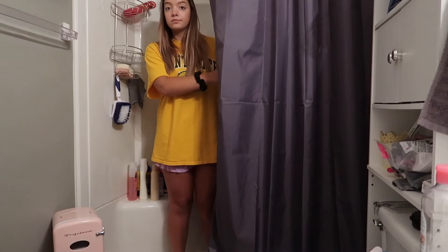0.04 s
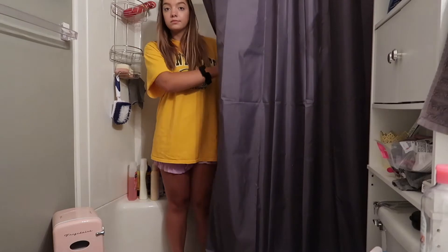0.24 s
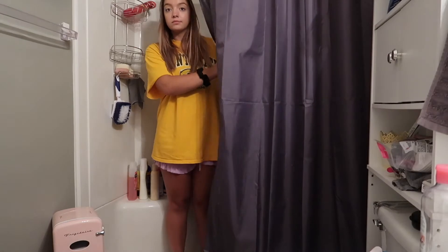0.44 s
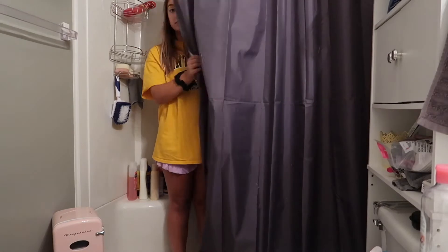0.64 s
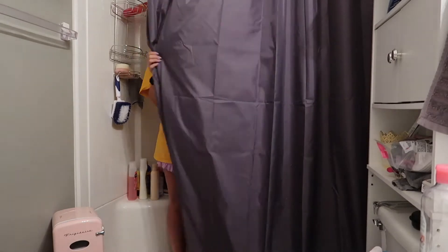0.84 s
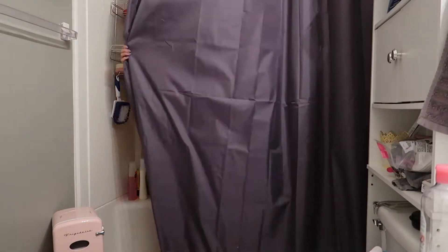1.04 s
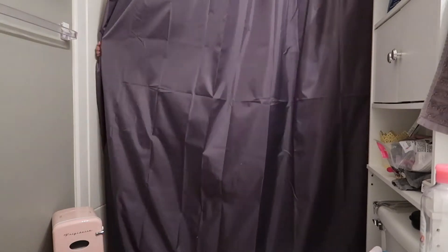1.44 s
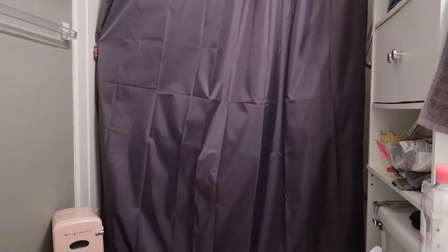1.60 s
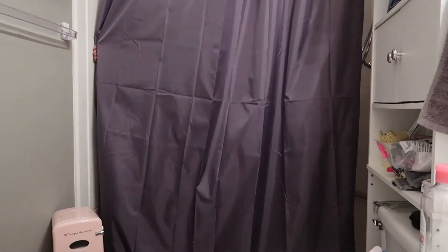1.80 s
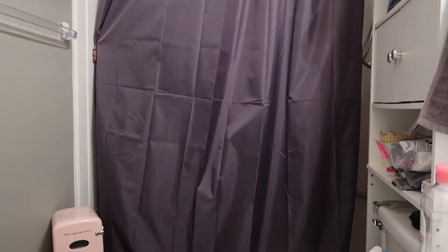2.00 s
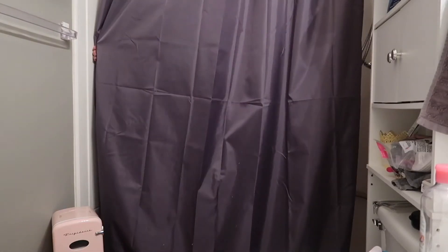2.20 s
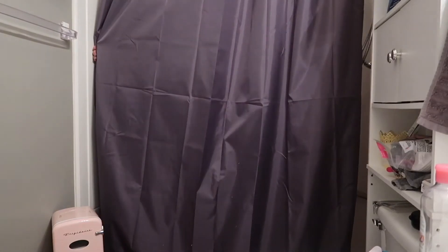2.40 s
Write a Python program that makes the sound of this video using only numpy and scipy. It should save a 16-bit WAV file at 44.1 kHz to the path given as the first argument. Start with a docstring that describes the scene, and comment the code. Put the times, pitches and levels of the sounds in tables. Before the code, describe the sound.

A plastic shower curtain starts rustling at about 0.2 seconds, its rings scraping along a metal rod. From 0.8 to 1.7 seconds the crinkling grows fuller, with short ring clatters, soft low flaps and a sharp snap near 1 second. The curtain then settles with a faint ring jingle, and one small tap comes at 2.3 seconds. A low ventilation hum runs underneath in the small bathroom.

```python
"""A faint plastic rustle rises over a low hum: a shower curtain is drawn shut in a small, hard bathroom.
Its rings scrape, chafe and clatter along the rod in short pushes, exciting the modes of the metal.
The sheet crinkles as its creases buckle, shoves the air in low puffs and snaps taut.
Close walls return a short reverberation; a few rings chime, and one last small tap ends the motion."""
import sys
import numpy as np
from scipy import signal
from scipy.fft import rfft, irfft, next_fast_len
from scipy.io import wavfile

SR = 44100
rng = np.random.default_rng(int(sys.argv[2]) if len(sys.argv) > 2 else 0)


def dump(signal):
    """Clip the signal to [-1, 1] and save it as 16-bit WAV at the path in sys.argv[1]."""
    limited = np.clip(np.atleast_2d(signal).T, -1, 1)
    pcm = np.round(limited * 32767).astype(np.int16)
    wavfile.write(sys.argv[1], SR, pcm)


N = 112454
TIME = np.arange(N) / SR

# Motion of the sheet. Each row: time in seconds, crinkling level in dB, rubbing level in dB.
SHEET_MOTION = [(0, -54, -51.5), (.08, -55, -57), (.16, -44, -44.5), (.26, -38.5, -42), (.36, -35, -40.5),
                (.45, -40, -41.5), (.6, -39.5, -42), (.73, -40, -42), (.77, -34.5, -36.5), (.84, -36, -38),
                (.96, -33.5, -34.5), (1.11, -33.5, -36), (1.24, -34, -35.5), (1.35, -33.5, -36),
                (1.47, -35.5, -38), (1.53, -32, -35.5), (1.66, -32.5, -31.5), (1.73, -42.5, -42.5),
                (1.88, -45.5, -46), (2.0, -51.5, -53.5), (2.24, -53, -52), (2.34, -59, -60),
                (2.55, -70, -74)]
# Spectra of the sheet's noises. Each row: frequency in Hz, gain in dB.
CRINKLE_SPECTRUM = [(500, -24), (1000, -4.5), (1500, 0), (2100, 1), (2900, -2), (4000, -7), (6000, -15),
                    (9000, -24), (11000, -32), (14000, -52.5)]
RUB_SPECTRUM = [(70, -31), (150, -10), (350, 1.5), (550, -1), (900, -7), (1500, -16), (4000, -33),
                (12000, -84)]
AIR_SPECTRUM = [(15, -11.5), (35, -11), (55, -9), (78, -5.5), (105, -6), (135, -8.5), (190, -7.5),
                (400, -16), (2000, -69)]
CRUMPLE_SPECTRUM = [(600, -11), (1300, -7), (2000, 0), (2700, -4.5), (3400, -9), (4500, -12), (9000, -44),
                    (15000, -70)]
# Modes of the rod and tub alcove. Each row: frequency in Hz, bandwidth in Hz, level in dB.
ALCOVE_MODES = [(128.4, 14, -12.5), (275.6, 4.7, -17), (355, 8.6, -18), (552.6, 65, -14.5)]
# Air pushed by the sheet. Each row: time in seconds, level in dB.
AIR_LEVELS = [(0, -52.5), (.7, -51), (.8, -44.5), (1.08, -38.5), (1.34, -42), (1.44, -42.5), (1.55, -34),
              (1.7, -43.5), (1.85, -54), (2.15, -56), (2.29, -49.5), (2.55, -75)]
# Ventilation noise and its hum lines. Each row: frequency in Hz, relative level in dB.
VENT_SPECTRUM = [(20, -28), (45, 1.5), (70, 2.5), (140, 2.5), (260, -5), (450, -7.5), (800, -16),
                 (2000, -23), (4000, -28), (8000, -38), (14000, -49), (16000, -57)]
HUM_LINES = [(134.6, -57.5), (255, -52.5)]
# Strokes of rings, rod and folds. Each row: start in seconds, length in seconds, relative level in dB.
RING_PUSHES = [(0.116, 0.13, -48), (0.198, 0.14, -41), (0.476, 0.0076, -39.5), (0.569, 0.024, -31),
               (0.632, 0.018, -56), (0.978, 0.077, -34), (1.134, 0.033, -34.5), (1.165, 0.025, -30),
               (1.22, 0.057, -37.5), (1.298, 0.023, -30), (1.485, 0.065, -43), (1.618, 0.028, -36),
               (1.844, 0.066, -56), (2.04, .04, -61)]
ROD_STROKES = [(.15, .29, -41.5)]
RING_CLATTERS = [(.133, .02, -60), (.25, 0.072, -65), (.405, .012, -62), (.586, .016, -47),
                 (.64, 0.013, -45.5), (.82, .01, -53), (.994, 0.017, -42), (1.135, 0.0078, -45),
                 (1.176, 0.011, -42), (1.302, 0.012, -34.5), (1.333, 0.012, -45), (1.51, 0.024, -45.5),
                 (1.56, .03, -50), (1.617, 0.0067, -46)]
FOLD_CRUMPLES = [(.479, 0.0035, -35), (.755, 0.026, -38.5), (.94, 0.016, -36.5), (.984, .008, -34),
                 (1.043, 0.019, -25.5), (1.5, 0.048, -44), (1.634, 0.012, -34)]
RING_CHIMES = [(1.845, 0.042, -49)]
# Spectra and modes of the rings. Each row: frequency in Hz, gain in dB.
SCRAPE_SPECTRUM = [(400, -5), (1500, 5), (3500, 9), (5000, 2.5), (7000, -6), (9500, -11), (11500, -51),
                   (15000, -45)]
CLATTER_SPECTRUM = [(3000, -7), (5500, 0), (8000, -5), (10500, -3.5), (12500, -5.5), (14500, -38)]
METAL_MODES = [(3890, 1), (4380, 1), (5390, -3), (6260, -1), (7540, 4.5), (8030, -1), (8770, -3),
               (10000, 1)]
SETTLING_MODES = [(2410, -9), (2730, 3), (4430, -16)]
# Rings and plastic chafing. Each row: start in seconds, length in seconds, level in dB, pitch in Hz,
# glide in octaves per second, bandwidth in Hz.
CHAFE_STROKES = [(0.346, 0.0068, -32, 1615, -25, 170), (0.354, 0.007, -35.5, 1154, -15, 170),
                 (0.372, 0.013, -35, 2340, -10, 400), (0.396, 0.0043, -35, 1880, 0, 350),
                 (0.398, .006, -31.5, 515.4, -15.5, 150), (0.78, 0.024, -41.5, 593, -0.5, 120),
                 (0.89, 0.019, -36, 2520, -3, 500), (1.022, 0.012, -27, 511.5, -1.5, 90),
                 (1.137, 0.0073, -25.5, 2110, -12, 260), (1.227, 0.018, -34, 2310, 1.5, 600),
                 (1.367, 0.01204, -34, 1860, -3, 450), (1.506, 0.032, -31, 2038, 1.5, 550),
                 (1.546, 0.0087, -23, 2033, 0, 500)]
# Blows on rod and rings. Each row: start in seconds, level in dB, pitch in Hz, 60 dB decay in seconds.
ROD_KNOCKS = [(.4035, -24.5, 432, 0.09), (1.025, -23, 502, 0.095), (1.179, -25, 3930, .05),
              (1.306, -24.5, 3880, 0.043), (2.2735, -34, 1860, .03)]
# Folds snapping and rings tapping; the sheet flapping as it fills with air.
# Each row: centre in seconds, peak in dB, frequency in Hz, half-width in milliseconds.
FOLD_SNAPS = [(.4795, -16, 2650, 0.23), (1.0445, -16, 2330, 0.56), (1.0479, -2, 2730, 0.42),
              (1.0535, -13, 2330, 0.52), (1.1668, -20, 2760, 1.1), (1.2332, -12.5, 1780, 0.27),
              (1.2442, -21.5, 2300, 1.3), (1.4099, -12, 2300, 0.25), (2.2733, -16.5, 2180, 0.56),
              (2.2731, -32, 4050, 0.39)]
SHEET_FLAPS = [(.77, -34.5, 75.5, 11), (.93, -46, 42, 25), (1.06, -33, 79, 21), (1.08, -32, 144, 26),
               (1.125, -36, 130, 21), (1.2, -40, 48, 17), (1.27, -31.5, 149.4, 32),
               (1.325, -35.5, 80.4, 25), (1.523, -33, 150, 9.4), (1.529, -29, 334, 6.7),
               (1.557, -29, 104, 7), (1.559, -23.5, 330, 4.9), (1.594, -28, 406, 6), (1.605, -34, 71.6, 25),
               (1.639, -29.5, 355, 9.3)]
# Stereo spread of curtain and room tone. Each row: frequency in Hz, gain of the side signal in dB.
CURTAIN_SPREAD = [(30, -40), (70, -40), (180, -25), (350, -21), (700, -21), (1400, -28), (2000, -26),
                  (2800, -16), (4000, -7), (6000, 0), (9000, 6), (11000, 9), (13000, 14)]
VENT_SPREAD = [(60, -63), (180, -19.5), (700, -4), (1400, -9.5), (2600, -4.5), (5000, 3), (9000, -4),
               (14000, 9)]

CREASES_PER_S, CREASE_SPREAD_DB = 1800, 2.5
SHARP_ATTACK_S = 0.00073
ROOM_T60_S, ROOM_DB, FIRST_ECHO_S = 0.18, -9, 0.00171


def from_db(db):
    """Amplitude grows tenfold for every 20 dB."""
    return 10 ** (np.asarray(db) / 20)


def unit_rms(x):
    """Dividing by the rms gives unit power."""
    return x / np.sqrt(np.mean(x ** 2) + 1e-20)


def in_time(rows):
    """Linear interpolation gives each level at every sample."""
    times, *columns = np.transpose(rows)
    return [np.interp(TIME, times, column) for column in columns]


def colour(x, spectrum):
    """Filtering multiplies the spectrum by a gain curve."""
    hz, db = np.transpose(spectrum)
    size = next_fast_len(2 * N)
    bins = np.maximum(np.arange(size // 2 + 1) * SR / size, 1)
    return irfft(rfft(x, size) * from_db(np.interp(np.log(bins), np.log(hz), db)), size)[:N]


def drift(hz):
    """Low-passed noise wanders slowly, at unit rms."""
    r = np.exp(-2 * np.pi * hz / SR)
    return unit_rms(signal.lfilter([1], [1, -2 * r, r * r], rng.standard_normal(2 * N))[N:])


def resonance(x, hz, width_hz):
    """A damped resonator selects one band, scaled to unit rms."""
    r = np.exp(-np.pi * width_hz / SR)
    return unit_rms(signal.lfilter([1, 0, -1], [1, -2 * r * np.cos(2 * np.pi * hz / SR), r * r], x))


def grains(per_s, spread_db):
    """Independent clicks of uneven size form shot noise, at unit rms."""
    sizes = from_db(spread_db * np.minimum(rng.exponential(1, N), 4))
    return unit_rms(sizes * rng.choice([-1, 1], N) * (rng.random(N) < per_s / SR))


def strokes(rows, attack_s=0.013, release_s=0.028):
    """A driven vibration builds up, then decays exponentially once the drive stops."""
    out = np.zeros(N)
    for start, length, db in rows:
        rise = 1 - np.exp(-np.maximum(TIME - start, 0) / attack_s)
        out += from_db(db) * rise * np.exp(-np.maximum(TIME - start - length, 0) / release_s)
    return out


def sheet(smooth_share=0.58):
    """Creases buckle over the friction of plastic on plastic; rod and alcove resonate with the rubbing."""
    crinkle_db, rub_db = in_time(SHEET_MOTION)
    flutter_db = 1.26 * drift(hz=21)
    pops = np.sqrt(1 - smooth_share) * grains(CREASES_PER_S, CREASE_SPREAD_DB)
    hiss = np.sqrt(smooth_share) * rng.standard_normal(N)
    crinkle = from_db(crinkle_db + flutter_db) * unit_rms(colour(pops + hiss, CRINKLE_SPECTRUM))
    friction = unit_rms(colour(grains(CREASES_PER_S, CREASE_SPREAD_DB), RUB_SPECTRUM))
    rub = from_db(rub_db + flutter_db) * friction
    body = sum(from_db(db) * resonance(rng.standard_normal(N), hz, width)
               for hz, width, db in ALCOVE_MODES)
    return crinkle + rub + from_db(rub_db) * body


def billow():
    """A moving surface displaces air, radiating low puffs."""
    air_db, = in_time(AIR_LEVELS)
    return from_db(air_db) * unit_rms(colour(rng.standard_normal(N), AIR_SPECTRUM))


def room_tone():
    """Ventilation gives dull broadband noise; two narrow bands are heard as a wavering hum."""
    hum = sum(from_db(db) * resonance(rng.standard_normal(N), hz, width_hz=1.9) for hz, db in HUM_LINES)
    vent = from_db(-48) * unit_rms(colour(rng.standard_normal(N), VENT_SPECTRUM))
    return vent + colour(hum, [(300, -1.0), (1200, -40)])


def ring_slides():
    """Sliding friction breaks each push into tiny slips; early on, one mode of the rod sings."""
    slips = unit_rms(colour(grains(per_s=2500, spread_db=1), SCRAPE_SPECTRUM))
    scrape = strokes(RING_PUSHES) * from_db(3 * drift(hz=24)) * slips
    rod_hz = 355.3 + 7.3 * drift(hz=13.4)
    rod_level = strokes(ROD_STROKES) * from_db(-3 * drift(hz=12))
    return scrape + rod_level * np.sin(2 * np.pi * np.cumsum(rod_hz) / SR)


def clatters():
    """Bunched rings collide and excite metal modes, each coming and going as the contacts move."""
    bursts = strokes(RING_CLATTERS, attack_s=0.0088, release_s=0.019)
    contacts = bursts * grains(per_s=1700, spread_db=0.5)
    crackle = unit_rms(colour(contacts, CLATTER_SPECTRUM))
    metal = sum(from_db(db + 9 * drift(hz=16)) * resonance(contacts, hz, width_hz=110)
                for hz, db in METAL_MODES)
    return np.std(contacts) * (crackle + from_db(-4) * unit_rms(metal))


def chafes():
    """Stick-slip friction gives a brief tone whose rough pitch may sink as the ring slows."""
    out = np.zeros(N)
    for start, length, db, hz, glide, width in CHAFE_STROKES:
        band = resonance(resonance(rng.standard_normal(N), hz, width), hz, width)
        analytic = signal.hilbert(band, next_fast_len(N))[:N]
        octaves = glide * np.clip(TIME - start - length / 2, -length, length)
        shift_hz = hz * (2 ** octaves - 1)
        gliding = analytic * np.exp(2j * np.pi * np.cumsum(shift_hz) / SR)
        tone = unit_rms(gliding.real / (np.abs(gliding) + 1))  # evens out the amplitude
        out += strokes([(start, length, db)], SHARP_ATTACK_S, release_s=0.0037) * tone
    return out


def knocks():
    """An impulse leaves one mode in free, damped vibration."""
    out = np.zeros(N)
    for start, db, hz, t60 in ROD_KNOCKS:
        age = np.maximum(TIME - start, 0)
        out += from_db(db - 60 * age / t60) * np.sin(2 * np.pi * hz * age)
    return out


def crumples():
    """Folds buckle in bursts of clicks as tension pulls the sheet taut."""
    creases = unit_rms(colour(grains(CREASES_PER_S, CREASE_SPREAD_DB), CRUMPLE_SPECTRUM))
    return strokes(FOLD_CRUMPLES, SHARP_ATTACK_S) * creases


def pulses(rows):
    """A snap or flap radiates a Gaussian wave packet: the shorter it is, the wider its band."""
    out = np.zeros(N)
    for centre, db, hz, half_ms in rows:
        offset = TIME - centre
        envelope = np.exp(-np.minimum((offset * 1000 / half_ms) ** 2, 50))
        out += from_db(db) * envelope * np.cos(2 * np.pi * hz * offset)
    return out


def chimes():
    """Lightly damped modes of the rings sound as the curtain settles."""
    modes = sum(from_db(db) * resonance(rng.standard_normal(N), hz, width_hz=19)
                for hz, db in SETTLING_MODES)
    return strokes(RING_CHIMES) * modes


def reflections(x):
    """Dense echoes from close, hard walls merge into an exponential tail of unit energy."""
    age = TIME[:SR // 2]
    tail = rng.standard_normal(len(age)) * from_db(-60 * age / ROOM_T60_S) * (age >= FIRST_ECHO_S)
    return signal.fftconvolve(x, tail / np.sqrt(np.sum(tail ** 2)))[:N]


def along_rod():
    """Creases and rings all along the rod add as incoherent sources."""
    return sheet() + ring_slides() + clatters() + crumples()


def scene(wall_share=0.4):
    """The curtain is centred; an uncorrelated side signal, partly off the walls, widens its treble."""
    wet = from_db(ROOM_DB)
    curtain = (along_rod() + chafes() + knocks() + chimes()) / np.sqrt(1 + wet ** 2) + pulses(FOLD_SNAPS)
    mid = curtain + wet * reflections(curtain) + pulses(SHEET_FLAPS) + billow() + room_tone()
    across = np.sqrt(1 - wall_share) * along_rod() + np.sqrt(wall_share) * reflections(curtain)
    side = colour(across, CURTAIN_SPREAD) + colour(room_tone(), VENT_SPREAD)
    return np.array([mid + side, mid - side])


def record(dry):
    """A steep low-pass filter attenuates the treble above 15.5 kHz by at least 70 dB."""
    return signal.sosfilt(signal.cheby2(12, 70, 15500, fs=SR, output="sos"), dry)


dry = scene()
out = record(dry)
dump(out)
```